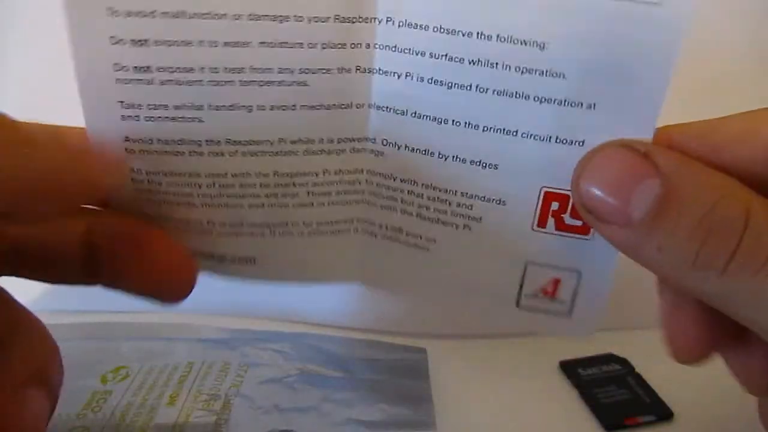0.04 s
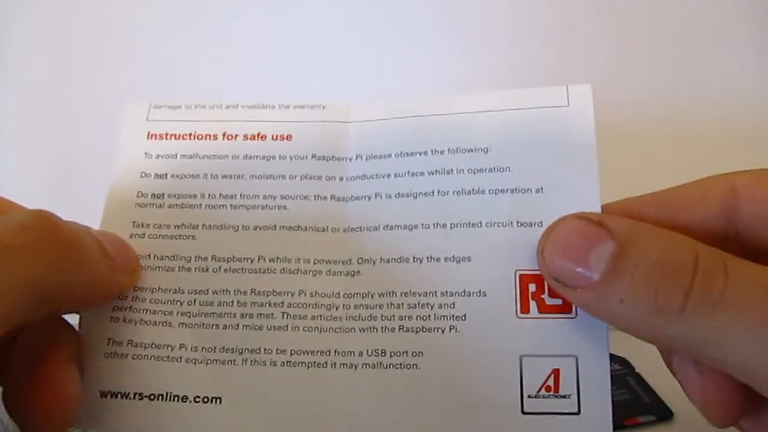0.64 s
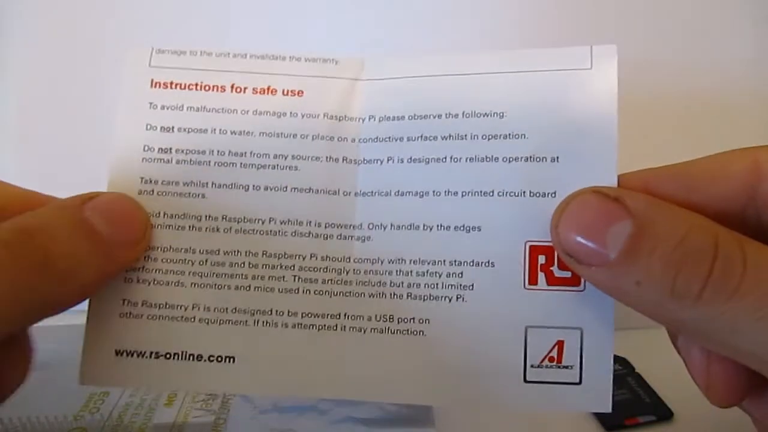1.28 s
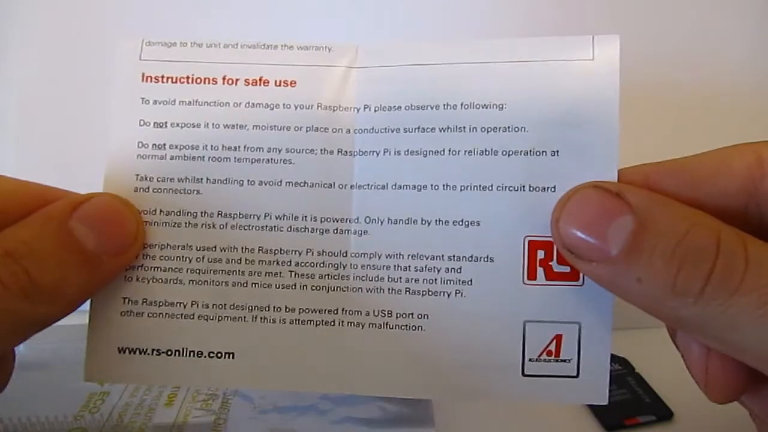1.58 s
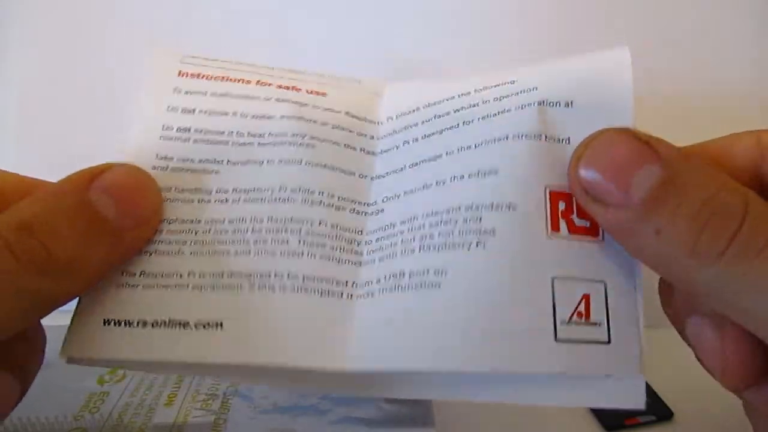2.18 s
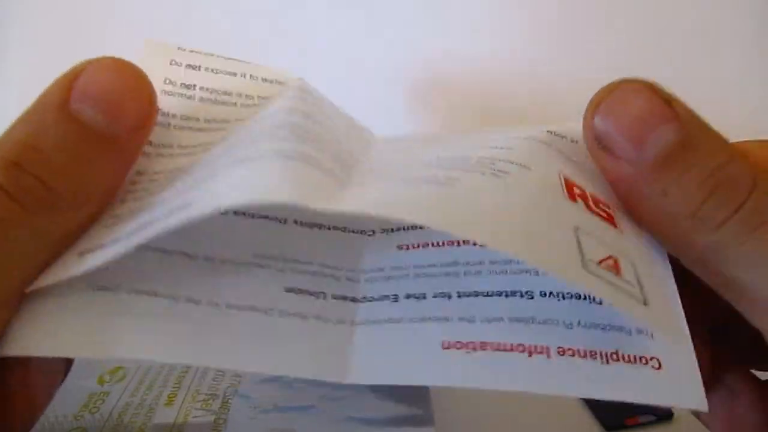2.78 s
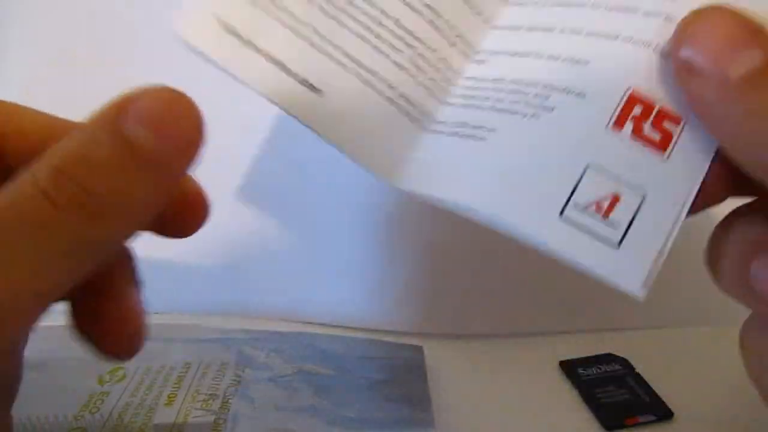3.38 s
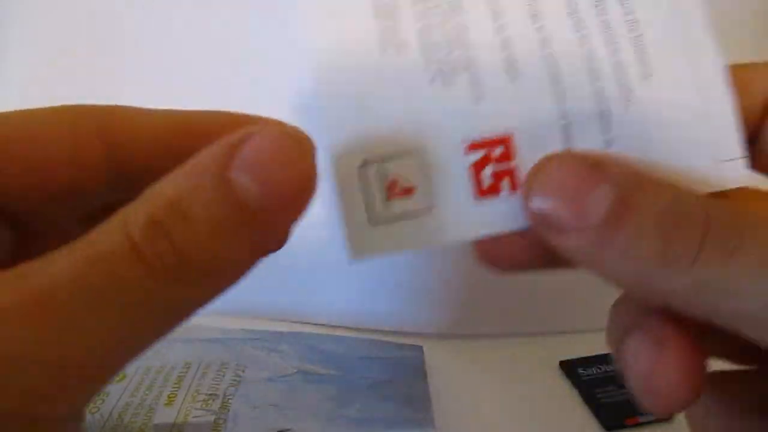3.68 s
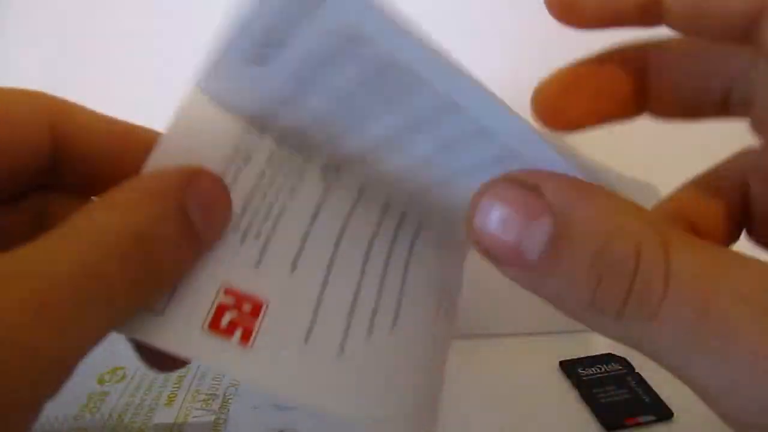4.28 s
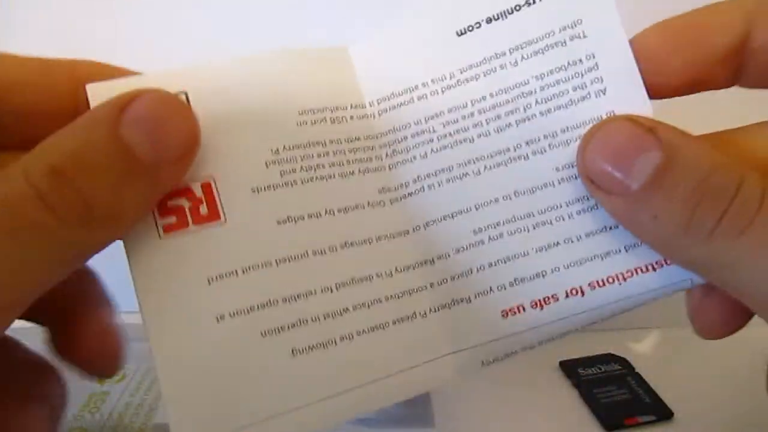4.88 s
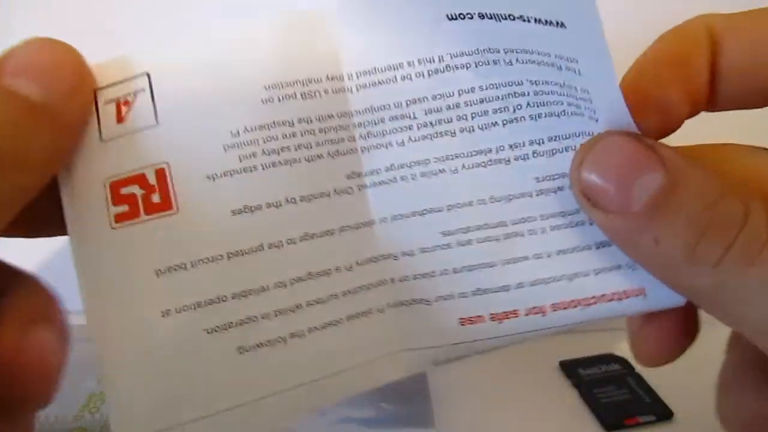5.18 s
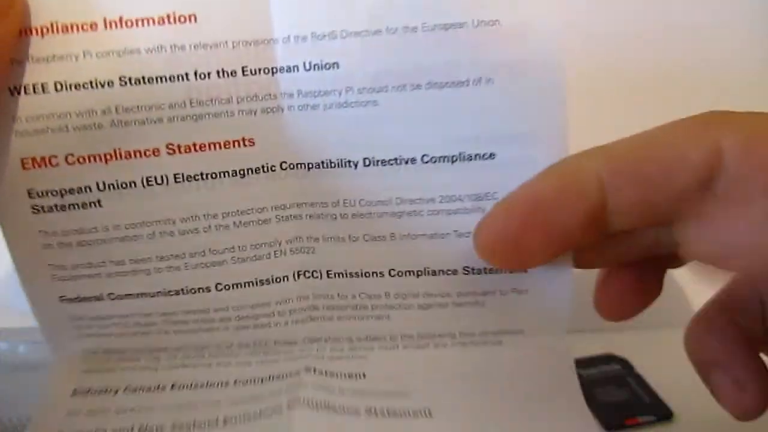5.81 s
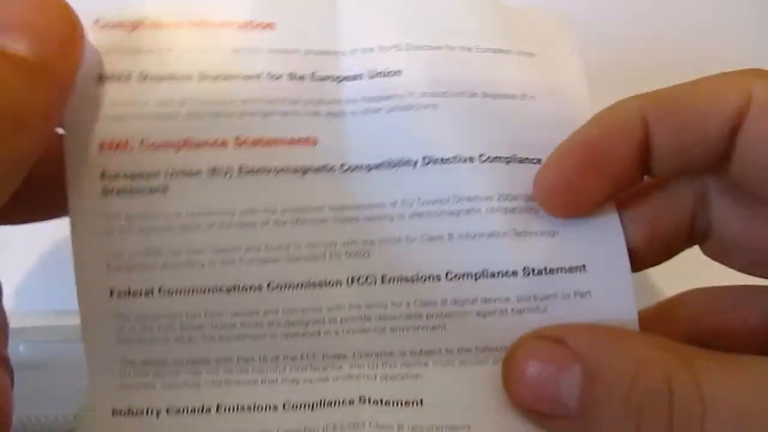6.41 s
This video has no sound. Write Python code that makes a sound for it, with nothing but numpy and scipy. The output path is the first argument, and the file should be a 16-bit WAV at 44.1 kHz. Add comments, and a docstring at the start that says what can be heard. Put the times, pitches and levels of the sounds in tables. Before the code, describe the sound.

A folded paper leaflet is handled close to the microphone in a quiet room. After a few faint ticks, its leaves slide apart with a hollow scrape, and the sheet buckles with sharp snaps and soft flaps. Fingers then rub and turn the paper, rustling unevenly, with a busier burst of crackles and pops near the end. Dull, low room noise lies underneath.

```python
"""Unfolding a paper leaflet

A folded leaflet is pulled open and turned over, close by, in a quiet room. The leaves slide apart
over a widening pocket of air and fingers rub the sheet. Panels flap, buckle and pop through, and
the creases snap. Dull room noise spreads wide around the paper."""
import sys
import numpy as np
from scipy import signal
from scipy.fft import rfft, irfft
from scipy.io import wavfile
from scipy.ndimage import uniform_filter1d

SR = 44100
rng = np.random.default_rng(int(sys.argv[2]) if len(sys.argv) > 2 else 0)


def master(y):
    """Save y as 16-bit WAV."""
    cut = np.clip(np.atleast_2d(y).T, -1, 1)
    pcm = np.round(cut * 32767)  # scale
    wavfile.write(sys.argv[1], SR, pcm.astype(np.int16))


N = 284445
FRAME, HOP = 512, 128
HZ = np.fft.rfftfreq(FRAME, 1 / SR)
TIMES = np.arange(N // HOP + 5) * HOP / SR


def amp(db):
    """Decibels to gain."""
    return 10 ** (np.asarray(db) / 20)


def unit_rms(x, axis=None):
    """Scales to an rms of one."""
    return x / np.sqrt(np.mean(abs(x) ** 2, axis=axis, keepdims=True) + 1e-20)


def curve(points, hz=HZ):
    """Interpolates points on a log frequency axis."""
    point_hz, values = np.transpose(points)
    return np.interp(np.log(hz + 1e-6), np.log(point_hz), values)


def follow(points):
    """Interpolates points in time, one value per frame."""
    return np.interp(TIMES, *np.transpose(points))[:, None]


def add(mix, start_s, sound):
    """Mixes a sound in at a time."""
    part = mix[round(start_s * SR):][:len(sound)]
    part += sound[:len(part)]


def shaped(x, gain):
    """Filters by a gain that changes from frame to frame."""
    spectra = signal.stft(x, nperseg=FRAME, noverlap=FRAME - HOP)[2]
    return signal.istft(spectra * gain[:spectra.shape[1]].T, nperseg=FRAME, noverlap=FRAME - HOP)[1][:N]


def impulse_response(gain):
    """Minimum-phase response with this gain."""
    log_gain = np.log(np.maximum(np.r_[gain, gain[-2:0:-1]], 1e-5))
    return np.fft.ifft(np.exp(np.conj(signal.hilbert(log_gain)))).real


def drift(frames):
    """Slow random motion of unit rms, one value per frame."""
    noise = rng.standard_normal(len(TIMES))
    return unit_rms(uniform_filter1d(uniform_filter1d(noise, frames), frames))[:, None]


def ripple(frames, bins=3):
    """Random patches in time and frequency, of unit rms."""
    field = uniform_filter1d(rng.standard_normal((len(TIMES), len(HZ))), bins, axis=1)
    return unit_rms(uniform_filter1d(uniform_filter1d(field, frames, axis=0), frames, axis=0))


def notch(depth_db, hz=4120, width_hz=290):
    """Gain with one bell-shaped dip."""
    return amp(-depth_db * np.exp(-((HZ - hz) / width_hz) ** 2))


# Room noise, common to both sides (mid) and opposed (side). Each row: frequency in Hz, relative dB.
ROOM_MID_SPECTRUM = [(18, -83), (30, -13), (81, 2), (161, -1), (222, 2), (337, -1.5), (641, -6.5),
                     (762, -6), (928, -7.5), (1480, -9.5), (3040, -18.5), (8150, -24.5), (11000, -96),
                     (14200, -88), (22000, -120)]
ROOM_SIDE_SPECTRUM = [(18, 0), (30, -61), (81, -2.5), (263, -1), (513, -7.5), (657, -10), (883, -11.5),
                      (1080, -15.5), (1950, -21), (3980, -32), (4850, -31), (8560, -37.5), (11000, -106),
                      (14200, -110), (22000, -120)]


def room_noise(spectrum, level_db, dip_db, waver_db=0.5, patchy_db=4.5, dips_from_s=2.02):
    """Dull background noise, turning patchy, mostly in the lows, after dips_from_s."""
    colour = amp(curve(spectrum, np.fft.rfftfreq(N, 1 / SR)))
    noise = irfft(rfft(rng.standard_normal(N)) * colour, N)
    patches = unit_rms(uniform_filter1d(rng.standard_normal((len(TIMES), len(HZ))), size=14, axis=0))
    unsteady = amp(waver_db * drift(frames=20) + patchy_db * patches)
    air = unit_rms(shaped(noise, notch(depth_db=11) * unsteady))
    dip_weight = (TIMES[:, None] > dips_from_s) * curve([(2000, 0.59), (3500, 0.21)])
    dips = amp(-dip_db * dip_weight * np.maximum(ripple(frames=20), 0))
    return amp(level_db) * shaped(air, dips)


# Room decay. Each row: frequency in Hz, t60 in seconds.
ROOM_T60 = [(150, 0.16), (1000, 0.53), (8000, 0.13)]


def reflections(x, near_s, near_share):
    """Quick scatter from hands and desk, then the short tail of the room."""
    t = np.arange(SR // 2) / SR
    hz, age_s, spectra = signal.stft(rng.standard_normal(len(t)) * (t > 0.005), SR, nperseg=256)
    decay = amp(-60 * age_s / curve(ROOM_T60, hz)[:, None])
    tail = signal.istft(spectra * decay, SR, nperseg=256)[1][:len(t)]
    near = rng.standard_normal(len(t)) * np.exp(-t / near_s)
    response = np.sqrt(near_share) * near / np.linalg.norm(near)
    response += np.sqrt(1 - near_share) * tail / np.linalg.norm(tail)
    return signal.fftconvolve(x, response)[:N]


# Flaps of the whole sheet. Each row: start in seconds, level in dB, rough pitch in Hz, t60 in seconds.
FLAPS = [(2.405, -44.5, 161, 0.26), (2.726, -33, 126, 0.073), (2.772, -42.5, 142, 0.21),
         (3.011, -39.5, 181, 0.12), (4.505, -47, 170, 0.21), (6.143, -49.5, 172.3, 0.15)]


def flaps(attack_s=0.0015):
    """The loose sheet wobbles and pushes soft, low puffs of air."""
    out, t = np.zeros(N), np.arange(SR // 3) / SR
    for start_s, db, hz, t60 in FLAPS:
        band = signal.butter(2, [hz * 0.4, hz * 1.27], "bandpass", fs=SR, output="sos")
        swell = (1 - np.exp(-t / attack_s)) * amp(-60 * t / t60)
        puff = signal.sosfilt(band, rng.standard_normal(len(t))) * swell
        add(out, start_s, amp(db) * puff * np.linalg.norm(swell) / np.linalg.norm(puff))
    return out


def slips(n, per_s, spread_db, hiss):
    """Paper fibres catch and let go: tiny uneven clicks over a smooth hiss."""
    sizes = amp(spread_db * np.minimum(rng.exponential(1, n), 4)) * rng.choice([-1, 1], n)
    clicks = unit_rms(sizes * (rng.random(n) < per_s / SR))
    return unit_rms(clicks + hiss * rng.standard_normal(n))


def catching(x, depth_db=1.8):
    """Dry friction catches and frees itself every few milliseconds."""
    grip = unit_rms(uniform_filter1d(rng.standard_normal(len(x)), 160))
    return unit_rms(x * amp(depth_db * grip))


def avalanche(crest_s, db, rise_s, fall_s, colour):
    """A run of slips swells to a crest and dies; returns its start and its sound."""
    t = np.arange(-SR // 5, SR // 4) / SR
    swell = np.exp(-np.where(t < 0, abs(t / max(rise_s, 1e-3)) ** 1.4, t / max(fall_s, 1e-3)))
    fibres = slips(len(t), per_s=4000, spread_db=1, hiss=0.91)
    crackle = signal.fftconvolve(fibres * swell, impulse_response(colour))
    sound = amp(db) * crackle * np.linalg.norm(swell) / np.linalg.norm(crackle)
    start_s = crest_s + t[0]
    return max(start_s, 0), sound[max(round(-start_s * SR), 0):]


# Narrow-band scuffs. Each row: crest in seconds, level in dB, rise and fall in seconds,
# centre and width in Hz.
SCUFFS = [(.15, -54, 0.012, 0.01, 5430, 850), (.5312, -47, 0.00087, 0.0022, 5500, 1100),
          (1.988, -57, 0.012, 0.015, 5260, 600), (2.041, -44, 0.0021, 0.02, 4470, 900),
          (2.4, -38.5, 0.003, 0.0069, 670, 264), (2.724, -33.5, 0.0033, 0.0031, 710, 238),
          (3.172, -54, 0.023, 0.017, 1050, 350), (3.567, -44, 0.013, 0.014, 550, 290),
          (4.114, -51.5, 0.0066, 0.012, 680, 303), (4.137, -48, 0.0038, 0.0088, 615, 250),
          (4.301, -50, 0.0027, 0.007, 1000, 500), (4.668, -48, 0.0023, 0.0051, 345, 220),
          (4.793, -47.5, 0.0073, 0.0084, 890, 403), (4.825, -45, 0.0014, 0.0031, 274, 203),
          (4.88, -41, 0.008, 0.0036, 1894, 700), (5.57, -44.5, .004, 0.0057, 915, 400),
          (5.615, -43.5, 0.011, 0.013, 1320, 800), (5.69, -41.5, 0.022, 0.016, 1940, 520),
          (5.77, -57, 0.059, 0.09, 1690, 515)]


def scuffs():
    """An edge skids or a panel pops through and excites a single resonance."""
    out = np.zeros(N)
    for crest_s, db, rise_s, fall_s, hz, width_hz in SCUFFS:
        resonance = 1 / (1 + (2 * (HZ - hz) / width_hz) ** 2)
        add(out, *avalanche(crest_s, db, rise_s, fall_s, resonance))
    return out


# Leaves sliding apart. Each row: time in seconds, level in dB.
SLIDE_LEVEL = [(2.02, -57.5), (2.065, -45.5), (2.16, -45), (2.19, -38), (2.31, -42), (2.365, -49.5),
               (2.41, -43.5), (2.48, -51), (2.59, -51.5), (2.68, -66)]
# Air pocket between them. Each row: time in seconds, main resonance in Hz.
POCKET_RESONANCE = [(1.97, 5300), (2.04, 4560), (2.07, 3070), (2.13, 2920), (2.22, 2990), (2.35, 2480),
                    (2.5, 2450), (2.66, 2380), (2.8, 2420)]
# Pocket response. Each row: multiple of the main resonance, gain in dB.
POCKET_RESPONSE = [(.08, -75), (.17, -23), (.29, 8.5), (.38, -1.5), (.45, 0.5), (.56, -58), (.67, -45),
                   (.79, 0.5), (1, 7), (1.25, -0.5), (1.6, -1.5), (2.1, -1), (2.8, -4), (4, 7)]


def sliding(parting_s=2.18, fill_s=0.3, flutter_db=1.2, fade_s=0.0083):
    """Leaf scrapes over leaf; the pocket between them fills with air, sinks in pitch and gains body."""
    thinness = np.exp(-np.maximum(TIMES[:, None] - parting_s, 0) / fill_s)
    multiple = HZ / follow(POCKET_RESONANCE)
    body_db = (7.5 - 16 * thinness) * curve([(0.45, 0.94), (0.7, 0.066)], multiple)
    treble_db = curve([(7500, 9), (11000, -23.5)])
    colour = amp(curve(POCKET_RESPONSE, multiple) + body_db + treble_db + 2.5 * ripple(frames=9))
    colour *= notch(depth_db=26, hz=4130, width_hz=220)
    start_s, end_s = SLIDE_LEVEL[0][0], SLIDE_LEVEL[-1][0]
    gate = follow([(start_s - fade_s, 0), (start_s, 1), (end_s, 1), (end_s + fade_s, 0)])
    grip = amp(follow(SLIDE_LEVEL) + flutter_db * drift(frames=4)) * gate
    scrape = catching(slips(N, per_s=5000, spread_db=-1, hiss=0.93))
    return shaped(scrape, unit_rms(colour, axis=1) * grip)


def pocket_notch(at_s, depth_db=24):
    """Sounds made inside the open pocket lose a band below its main resonance."""
    times, main_hz = np.transpose(POCKET_RESONANCE)
    multiple = HZ / np.interp(at_s, times, main_hz)
    dip = np.exp(-((multiple - 0.6) / 0.14) ** 2)
    return amp(-depth_db * dip * (times[0] < at_s < times[-1]))


# Radiation of the sheet. Each row: frequency in Hz, gain in dB.
SHEET_RESPONSE = [(60, -26), (180, -0.5), (450, -5.5), (800, -5), (1400, -3), (2600, -3.5), (4100, -8),
                  (5300, -1), (7500, -2.5), (9500, -10), (11000, -26)]
# Panel resonances between the hands. Each row: centre in Hz, width in Hz, gain in dB.
PANEL_MODES = [(638, 86, 12.5), (1001, 190, 10.5), (1430, 62, 6), (1857, 89, 7.5), (2395, 340, 4),
               (3080, 320, 5.5)]


def sheet(body_db=0, fizz_db=0, bend=1):
    """Sheet colour: broad bends bring out lows (body), sharp edges highs (fizz); bend retunes panels."""
    modes_db = sum(db / (1 + (2 * (HZ / bend - hz) / width) ** 2) for hz, width, db in PANEL_MODES)
    lows_db = body_db * curve([(1050, 0.99), (1750, 0.061)])
    highs_db = fizz_db * curve([(3400, 0.01), (5200, 0.89)])
    return amp(curve(SHEET_RESPONSE) + modes_db + lows_db + highs_db)


# Arching folds. Each row: start and end in seconds, first and last centre in Hz, depth in dB.
FOLDS = [(2.98, 3.25, 1510, 1410, 25), (4.97, 5.07, 2000, 2146, 10), (5.117, 5.23, 2100, 2000, 12),
         (5.22, 5.37, 1860, 1720, 28), (6.16, 6.297, 1350, 1450, 12)]


def fold_notches(width_hz=270):
    """A fold arches over the fingers and cancels one band: a notch opens, slides and closes."""
    gain = 1
    for start_s, end_s, first_hz, last_hz, depth_db in FOLDS:
        progress = np.clip((TIMES[:, None] - start_s) / (end_s - start_s), 0, 1)
        arch = 2 * np.sqrt(progress * (1 - progress))
        gain = gain * notch(depth_db * arch, first_hz + (last_hz - first_hz) * progress, width_hz)
    return gain


def stroke(start_s, length_s, db, body_db, fizz_db):
    """Gain per frame and bin of a stroke that grips, holds and lets go; a light touch is airier."""
    grip_s, release_s = 0.021, 0.035
    t = TIMES[:, None] - start_s
    hold = amp(-2 * (1 - np.clip(t / length_s, 0, 1)))
    grip = np.clip(t / grip_s, 0, 1) * hold * np.exp(-np.maximum(t - length_s, 0) / release_s)
    lightness = np.interp(db, [-67.5, -49], [1, 0])
    air_db = lightness * curve([(6000, 0), (9000, 4.15)])
    return amp(db + air_db) * grip * sheet(body_db, fizz_db)


# Fingers and leaves stroking the sheet. Each row: start and length in seconds, level, body, fizz in dB.
STROKES = [(2.711, 0.043, -49, -13, 0), (2.807, 0.22, -65, -2, -27), (3.003, 0.044, -55.5, 7, 5),
           (3.07, 0.089, -59, 1, 0), (3.166, 0.13, -50.5, -27, -2.5), (3.242, 0.097, -48, -11, -0.5),
           (3.344, 0.12, -68.5, 2.5, 4), (3.478, 0.12, -53, -10.5, 6), (3.667, 0.055, -68, 2, 9.5),
           (3.831, 0.073, -65, -3, 0), (4.092, 0.065, -60, 1, -0.5), (3.937, 0.14, -63, 1, 4),
           (4.2, 0.11, -62, -2, 1), (4.328, 0.047, -64.5, 2, 2.5), (4.399, 0.043, -63, -4, 2),
           (4.483, 0.043, -58.5, 11, 3), (4.604, 0.17, -66, 9.5, 9), (4.763, 0.12, -56, -6, 7.5),
           (4.862, 0.23, -50.5, -8, -1.5), (5.058, 0.056, -44, -4, -5.5), (5.122, 0.072, -49.5, 1, -3.5),
           (5.194, 0.3, -54, -5.5, -1.5), (5.45, 0.18, -53.5, -0.5, 0.5), (5.659, 0.046, -47.5, -5, -7),
           (5.73, 0.088, -65.5, -11, -3), (6.15, 0.1, -54.5, -16, 4), (6.266, 0.1, -59, -0.5, 0)]
# A narrow dip near 4.1 kHz in the rubbing fades out and partly returns.
# Each row: time in seconds, share removed.
NOTCH_FADE = [(2.95, 0), (3.05, 1), (3.2, 1), (3.33, 1), (3.37, 0.34)]


def rubbing(bend_share=0.13, flutter_db=0.5):
    """Skin and paper rub with an unsteady grip: dry hiss through the panels' wandering resonances."""
    power = sum(stroke(*row) ** 2 for row in STROKES)
    colour = np.sqrt(power / (np.mean(sheet() ** 2) / 3))
    colour *= sheet(bend=np.exp(bend_share * drift(frames=30))) / sheet()
    # fine resonances come and go as the sheet bends
    fine_db = curve([(2000, 4.5), (5000, 2.5)]) * ripple(frames=16)
    broad_db = 1.8 * ripple(frames=7, bins=16)
    treble_notch = notch(30 * (1 - follow(NOTCH_FADE)), hz=4100 + 90 * drift(frames=70), width_hz=250)
    colour *= amp(fine_db + broad_db - 0.6) * fold_notches() * treble_notch
    fibres = catching(slips(N, per_s=1600, spread_db=3, hiss=0.8))
    return shaped(fibres, colour * amp(flutter_db * drift(frames=4)))


# Panels buckling or edges flicking past each other. Each row: crest in seconds, level in dB,
# length in seconds, body and fizz in dB.
BUCKLES = [(2.4, -29.5, 0.014, -5.5, -4), (2.518, -44.5, 0.015, -1, -6), (2.582, -38.5, 0.01, 0, -10),
           (2.597, -41.5, 0.01, 13.5, 7.5), (2.718, -32, 0.014, -6, -9), (2.725, -28.5, 0.0043, 0, 2.5),
           (3.015, -41.5, 0.012, -13, -3), (3.251, -34.5, 0.0046, -12, -6), (3.262, -33.5, 0.009, -10, -4),
           (3.329, -34.5, 0.043, -3, 4), (3.56, -41, 0.031, 4, 7), (4.511, -43, 0.008, 12, -9),
           (4.535, -40, 0.006, 9, -12), (4.879, -41, 0.024, -7, -6), (4.914, -43.5, 0.028, -1, 0),
           (5.023, -41.5, 0.012, -2, -1), (5.0625, -31.5, 0.0052, -8, 0), (5.11, -42, 0.047, 2, -13),
           (5.375, -34, 0.032, -9.5, -5), (5.484, -38, 0.025, 0.5, -17), (5.673, -35, 0.031, -5.5, -6),
           (6.146, -39, 0.017, 12.5, -4.5)]


def buckles(rise_share=0.59):
    """A bending panel sets off an avalanche of slips that rings the whole sheet."""
    out = np.zeros(N)
    flex = amp(1.8 * ripple(frames=12))
    for crest_s, db, length_s, body_db, fizz_db in BUCKLES:
        colour = sheet(body_db, fizz_db) * flex[np.searchsorted(TIMES, crest_s)] * pocket_notch(crest_s)
        add(out, *avalanche(crest_s, db, length_s * rise_share, length_s * (1 - rise_share), colour))
    return out


def judder(start_s=5.1315, gap_s=0.013, count=6, rise_s=0.00046, fall_s=0.00092, hz=645, sag_oct=0.5):
    """A fingertip sticks and slips: rows for an even run of dull pops, strongest in the middle."""
    peaks_db = -28 - 10 * np.linspace(-1, 1, count) ** 2
    return [(start_s + k * gap_s, db, rise_s, fall_s, hz, sag_oct) for k, db in enumerate(peaks_db)]


def dents(per_s=42, spread_db=2, low_hz=600, high_hz=2230, rise_s=0.00036, fall_cycles=1.7, sag_oct=0.3):
    """Small dents flip under each stroke: rows for faint pops, each at its own pitch."""
    rows = []
    for start_s, length_s, stroke_db, body_db, _ in STROKES:
        times = start_s + np.cumsum(rng.exponential(1 / per_s, size=40))
        peaks_db = stroke_db + 0.42 * body_db + 4 + spread_db * rng.standard_normal(len(times))
        pitches = low_hz * (high_hz / low_hz) ** rng.random(len(times))
        rows += [(at_s, db, rise_s, fall_cycles / hz, hz, sag_oct)
                 for at_s, db, hz in zip(times, peaks_db, pitches) if at_s < start_s + length_s]
    return rows


# Panels popping through. Each row: crest in seconds, peak in dB, rise and fall in seconds,
# pitch at the crest in Hz, sag after it in octaves.
POPS = [(.5322, -40.5, .0005, 0.002, 1010, 0.039), (.555, -38.5, 0.00017, .0012, 900, 0.63),
        (.6012, -37, 0.00026, 0.0014, 900, 0.16), (2.3907, -29.5, 0.00032, 0.0022, 644, 0.026),
        (2.7159, -22, 0.00072, 0.0026, 715, 0.021), (2.922, -34, .0003, 0.0033, 860, 0),
        (4.5058, -33, 0.00027, 0.0012, 780, .8), (4.5308, -34, .0002, 0.0046, 685, 0.12),
        (4.8811, -29.5, 0.0022, 0.003, 1003, 0.024), (5.0745, -20, 0.00013, 0.00074, 1590, 1.2),
        (5.0928, -30, 0.00026, .0008, 1000, 0.45), (5.106, -39, 0.00014, 0.00097, 1150, 0.14),
        (5.4341, -35.5, 0.0008, .002, 573, 0), (5.4854, -23.5, 0.00097, 0.0016, 1210, 1.2),
        (5.6772, -20, 0.0021, .0013, 1880, 0.092), (6.0079, -36.5, 0.00018, 0.0017, 1250, 0),
        (6.1413, -38, 0.0037, .0042, 1090, 0)]


def pops(sag_s=0.0017):
    """A panel flips over and rings for a few cycles, nearly pure, with sagging pitch."""
    out, t = np.zeros(N), np.arange(-SR // 50, SR // 25) / SR
    for crest_s, db, rise_s, fall_s, hz, sag_oct in POPS + judder() + dents():
        cycles = np.cumsum(hz * 2 ** (-sag_oct * np.tanh(t / sag_s))) / SR
        ring = np.sin(2 * np.pi * (cycles - cycles[t < 0][-1]))
        swell = np.exp(-abs(t) / np.where(t < 0, rise_s, fall_s))
        add(out, crest_s + t[0], amp(db) * swell * ring)
    return out


def crinkles(per_s=18, offset_db=-4.5, spread_db=3, extra_body_db=17, extra_fizz_db=10):
    """Each stroke bends the sheet: rows for faint snaps at random moments."""
    rows = []
    for start_s, length_s, stroke_db, body_db, fizz_db in STROKES:
        times = start_s + np.cumsum(rng.exponential(1 / per_s, size=40))
        levels_db = stroke_db + offset_db + spread_db * rng.standard_normal(len(times))
        rows += [(at_s, db, body_db + extra_body_db, fizz_db + extra_fizz_db)
                 for at_s, db in zip(times, levels_db) if at_s < start_s + length_s]
    return rows


# Creases snapping and fingertips landing. Each row: start in seconds, level, body and fizz in dB.
SNAPS = [(0.5316, -47, 2, -25), (0.5543, -50, 3, -14), (0.601, -44.5, 5.5, -21), (2.3898, -34.5, 0, -2),
         (2.419, -40, 19, -1), (2.5069, -43, -9, -3), (2.5717, -37.5, 0.5, -1), (2.698, -41, 11, 4),
         (2.9218, -46, 3, 1.5), (3.009, -36.5, -4, -1), (3.251, -39, -10, 5), (3.7964, -53.5, 12, -14),
         (4.066, -53.5, 2, 0), (4.1384, -54.5, 3, -6), (4.2994, -53, 14, -10), (4.334, -53, 0, 2),
         (4.4939, -47.5, 0, 0), (4.505, -43, 4, -3), (4.53, -43, 9, -1), (4.549, -47, 16, -6),
         (5.014, -42, -4, 1), (5.0622, -34.5, 2, 8), (5.0748, -32, -7, -1), (5.0919, -38.5, 0, 8),
         (5.106, -41, -3, -10), (5.119, -40, -5, -4), (5.4332, -48, 10, -2), (5.484, -40.5, 3, -4),
         (5.824, -52.5, 13, -13), (6.008, -50, 7, -1), (6.1003, -51, 7, -11), (6.141, -42.5, 6.5, 6.5),
         (6.169, -47.5, 26, -1), (6.3719, -45.5, 14, 3)]


def snaps(longest_t60_s=0.017, halving_db=18):
    """A crease pops through: one rounded push of air, then a rattle that shortens as fizz falls."""
    out, t = np.zeros(N), np.arange(SR // 10) / SR
    flex = amp(1.2 * ripple(frames=12))
    push = 0.32 * np.hanning(11)
    noises = rng.standard_normal((250, len(t)))
    for (start_s, db, body_db, fizz_db), noise in zip(SNAPS + crinkles(), noises):
        t60 = longest_t60_s * 2 ** (min(fizz_db, 0) / halving_db)
        rattle = noise * amp(-60 * t / t60)
        pulse = rattle / np.linalg.norm(rattle)
        pulse[:len(push)] += push
        colour = sheet(body_db, fizz_db) * flex[np.searchsorted(TIMES, start_s)]
        colour *= notch(depth_db=7) * pocket_notch(start_s)
        snap = signal.fftconvolve(pulse, impulse_response(colour))
        rms_over_5ms = np.sqrt(np.sum(snap ** 2) / (0.005 * SR))
        add(out, start_s, amp(db) * snap / rms_over_5ms)
    return out


# Direct sound, left against right. Each row: frequency in Hz, gain in dB.
LEFT_GAIN = [(1000, 1), (4000, -0.5), (6500, 0), (9500, 6.5)]
# Its phase lead at rest. Each row: frequency in Hz, phase in radians.
LEFT_PHASE = [(4500, 0.086), (7000, 1), (10000, 1)]
# Scatter opposed between the sides. Each row: frequency in Hz, dB against the direct sound.
SIDE_SCATTER = [(100, -2.5), (400, -5.5), (900, -12), (2000, -20), (4000, -25.5), (5500, -10), (8000, -11),
                (10500, -1)]


def scene(echo_db=-16, sway=0.6):
    """The paper sways just ahead of the listener; reflections and room noise surround it."""
    paper = rubbing() + sliding() + snaps() + pops() + buckles() + scuffs() + flaps()
    phase = curve(LEFT_PHASE) * (1 + sway * np.tanh(drift(frames=16)))
    lean = amp(curve(LEFT_GAIN) / 2) * np.exp(0.5j * phase)
    direct = np.array([shaped(paper, lean), shaped(paper, 1 / lean)])
    mid = amp(echo_db) * reflections(paper, near_s=0.034, near_share=0.027)
    mid += room_noise(ROOM_MID_SPECTRUM, level_db=-57.5, dip_db=21.5)
    scatter = reflections(paper, near_s=0.0015, near_share=0.84)
    side = irfft(rfft(scatter) * amp(curve(SIDE_SCATTER, np.fft.rfftfreq(N, 1 / SR))), N)
    side += room_noise(ROOM_SIDE_SPECTRUM, level_db=-50.5, dip_db=-0.5)
    return direct + np.array([mid + side, mid - side])


def record(dry):
    """Steep low-pass at 10950 Hz."""
    lowpass = signal.firwin(511, 10950, window=("kaiser", 9), fs=SR)
    return signal.oaconvolve(dry, lowpass[None], "same")


dry = scene()
out = record(dry)
master(out)
```